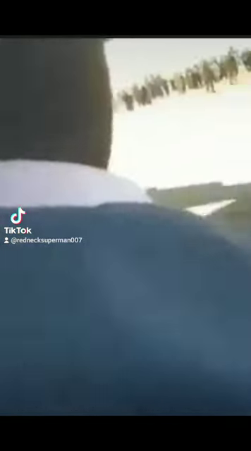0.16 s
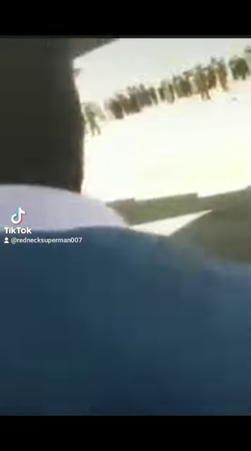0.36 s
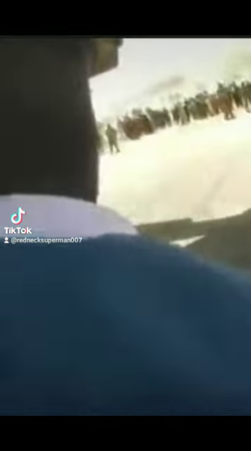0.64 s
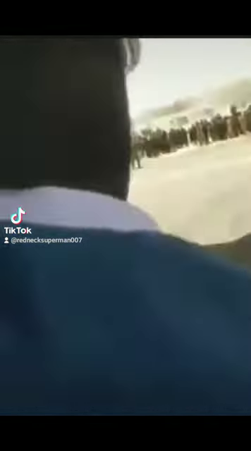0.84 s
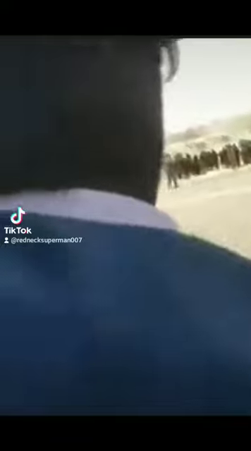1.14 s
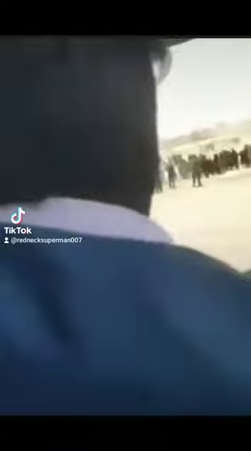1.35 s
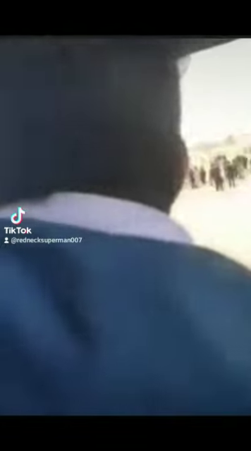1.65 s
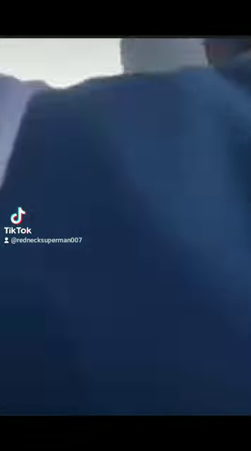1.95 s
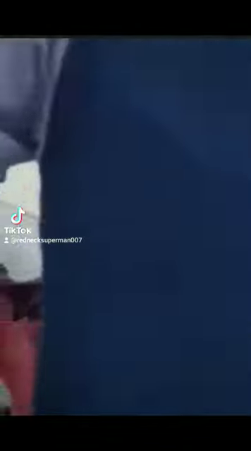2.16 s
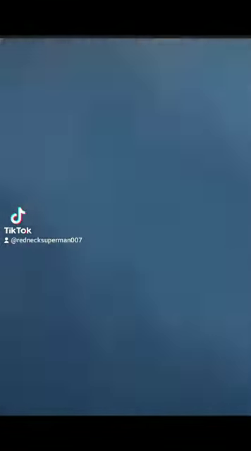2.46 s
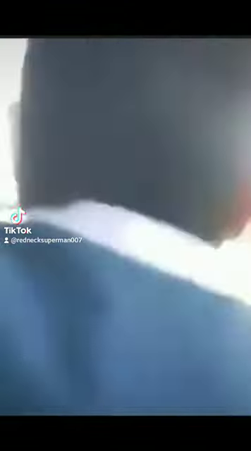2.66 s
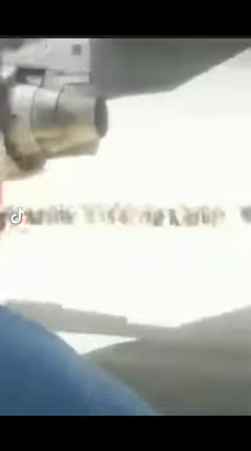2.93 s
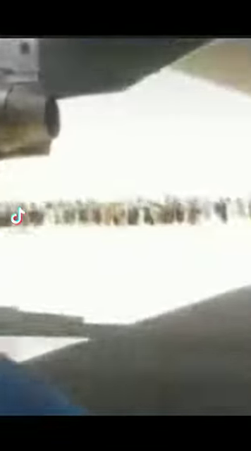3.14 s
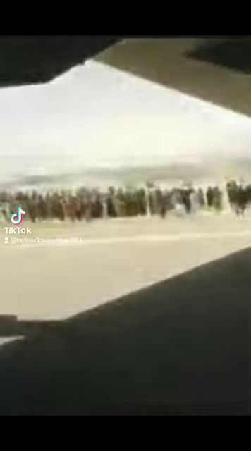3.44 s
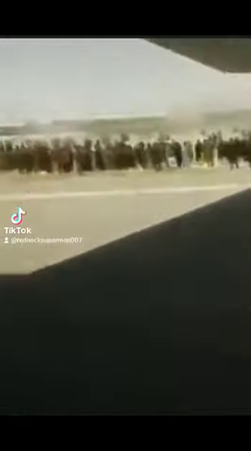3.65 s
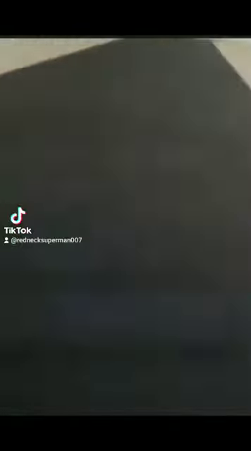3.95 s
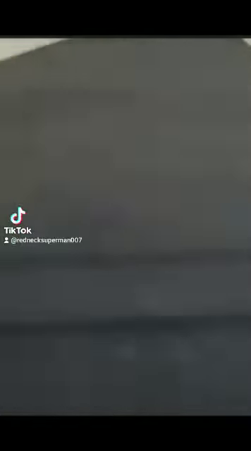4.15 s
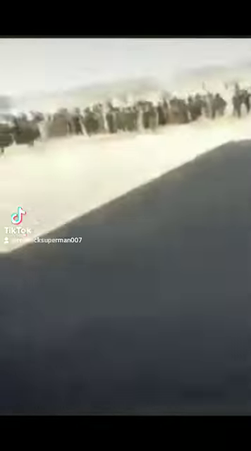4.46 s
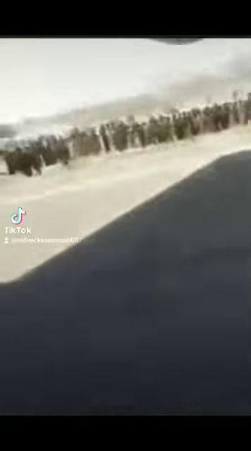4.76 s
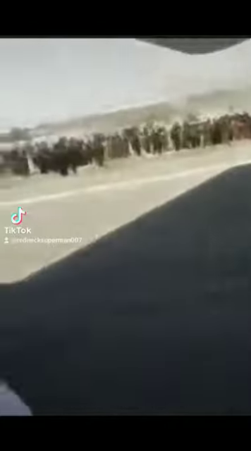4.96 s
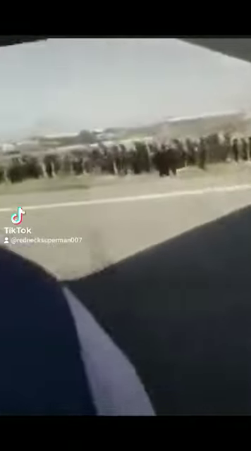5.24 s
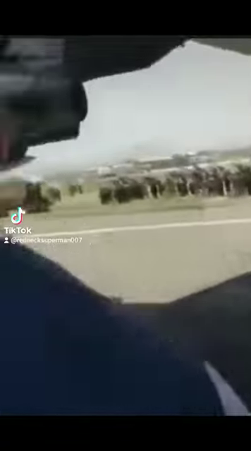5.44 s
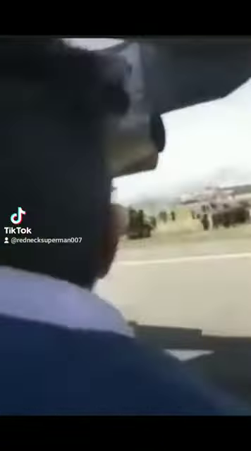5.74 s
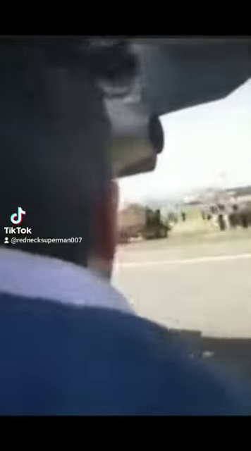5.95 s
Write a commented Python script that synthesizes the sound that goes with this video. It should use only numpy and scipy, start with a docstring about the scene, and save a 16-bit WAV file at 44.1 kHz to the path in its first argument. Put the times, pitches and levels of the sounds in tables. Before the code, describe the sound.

The microphone is inside the cabin of an aircraft rolling over an open airfield. From the very start, a strong, bright rush of air howls in gusts, with low buffeting and a crackling sizzle. It stops abruptly at 0.7 seconds. That leaves the jet engines at a lower level: a wide exhaust roar, a turbine hiss and a fuzzy, high, drifting whine, over the low rumble of the airframe and the boom of the cabin. Between about 1.7 and 2.1 seconds everything swells together, then stays loud and steady until the end, just after 6 seconds. The whine comes and goes, standing out near 0.8, 3 and 4 seconds and from 5 seconds onward. Throughout, a hollow colouring slides across the stereo image as the microphone turns, and the middle and high tones have a watery flicker.

```python
"""Jet engines heard from the cabin of an aircraft rolling over an open airfield.
The exhaust roars, the turbines hiss and whine in a fuzzy band, the cabin booms and the airframe rumbles;
all swell once, about 2 s in. A strong, howling air rush covers the start and stops abruptly at 0.7 s.
Stereo hollows slide as the microphones turn; midrange and treble have a watery flicker."""
import sys
import numpy as np
from scipy import signal
from scipy.fft import rfft, irfft, next_fast_len
from scipy.io import wavfile
from scipy.ndimage import uniform_filter1d

SR = 44100
rng = np.random.default_rng(int(sys.argv[2]) if len(sys.argv) > 2 else 0)


def wrap_up_sound(samples):
    """Save the sound to the file named by the first command line argument, as 16-bit audio."""
    columns = np.atleast_2d(samples).T
    # keep every value between -1 and 1, then stretch to whole-number steps
    tamed = np.clip(columns, -1, 1)
    steps = np.round(tamed * 32767).astype(np.int16)
    wavfile.write(sys.argv[1], SR, steps)


N = 269010
TIME_S = np.arange(N) / SR
FFT_SIZE, OVERLAP = 2048, 1536
BIN_HZ = np.fft.rfftfreq(FFT_SIZE, 1 / SR)
CREST_S = 3.47  # mid-roll

# high sizzle spectrum (frequency [Hz], density [dB])
SIZZLE_SPECTRUM = [(7000, -50), (8300, -7.5), (9200, -3.5), (10200, -1), (11300, 0), (12200, -12)]


def exhaust(drive_db):
    """The jet mixes with still air in a wide roar, loudest in mid-roll."""
    # (frequency [Hz], density [dB])
    roar_spectrum = [(200, -15.5), (400, -4.5), (500, -1.5), (620, -2.5), (750, 0), (900, -4), (1100, -2.5),
                     (1350, -4.5), (1600, -3.5), (2400, -3.5), (2900, -22), (4000, -40), (8000, -65)]
    ease_db_per_s = -0.52
    return amp(-18 + drive_db + ease_db_per_s * abs(TIME_S - CREST_S)) * turbulence(roar_spectrum)


def turbine(drive_db):
    """Air hisses through the compressor; its blade rows add a fuzzy, drifting whine."""
    # (frequency [Hz], density [dB])
    hiss_spectrum = [(1800, -35), (2500, -9.5), (2950, -1), (3450, -2), (3900, 0), (4500, -0.2),
                     (5200, -0.5), (6200, -5.5), (7000, -13.5), (8600, -38), (12200, -58)]
    # (time [s], centre [Hz], level [dB])
    whine_track = [(0, 3900, -15), (.8, 3930, 5), (1.3, 4130, -9), (1.8, 4080, -14), (2.9, 4100, 6),
                   (3.6, 4090, -4), (4.0, 3940, 8), (4.5, 4060, -7), (5.05, 4000, 7), (5.4, 4004, 6),
                   (5.7, 4064, 2), (6.1, 4200, 8.5)]
    # core and skirt (multiple of centre [1], width [Hz], level [dB])
    whine_bands = [(1.0, 33, 0.5), (1.0, 650, -1.5)]
    hiss = amp(-14.5 + drive_db) * turbulence(hiss_spectrum)
    centre_hz, whine_db = curve(whine_track)
    whine = sum(amp(db) * noise_band(multiple * centre_hz, width_hz)
                for multiple, width_hz, db in whine_bands)
    return hiss + amp(-31 + whine_db) * whine


def air_rush():
    """A bright, gusty air stream with low buffeting; it sizzles and crackles most in the gusts."""
    # (frequency [Hz], density [dB])
    stream_spectrum = [(60, -42), (150, -20), (300, -14.5), (430, -6.5), (540, -4), (620, -12), (800, -1.5),
                       (1100, -3), (1550, -2), (2100, -3), (2600, -3), (3200, -1.5), (3750, -3), (4500, -6),
                       (5200, -3), (6200, -9.5), (7100, -14.5), (8600, -35), (12200, -60)]
    buffet_spectrum = [(100, -32), (300, -8), (520, 2.5), (800, 2.5), (1000, -26), (1500, -27)]
    # (time [s], half width [s], gain [dB])
    gusts = [(.17, 0.06, 1.5), (.335, 0.012, -0.5), (.38, .015, 1), (.425, 0.018, 2.5), (.5, 0.039, 3),
             (.55, 0.013, -0.5), (.635, 0.016, -2), (.708, .008, 3)]
    shoves = [(.115, 0.042, 3.5), (.42, 0.033, -3), (.66, 0.02, 4)]
    gust_db = bumps(gusts) + 0.67 * wobble(20, 160)
    shared_only = np.array([[1], [0]])  # arrives from one direction
    buffet = amp(-11.5 + bumps(shoves)) * turbulence(buffet_spectrum) * shared_only
    grit = amp(-17.5) * turbulence(SIZZLE_SPECTRUM) + amp(-13) * crackle()
    stream = gliding_hollows(turbulence(stream_spectrum) + buffet + howl(gust_db))
    return amp(-12.5 + rush_envelope_db()) * (amp(gust_db) * stream + amp(1.1 * gust_db) * grit)


def rush_envelope_db():
    """Hold, sag, abrupt cut, brief tail in the cabin."""
    sag_s, sag_db_per_s = 0.57, -16
    cut_s, cut_db_per_s = 0.712, -500
    tail_db, tail_db_per_s = -1, -135
    after_s = np.maximum(TIME_S - cut_s, 0)
    cut_db = np.maximum(cut_db_per_s * after_s, tail_db + tail_db_per_s * after_s)
    return sag_db_per_s * np.maximum(TIME_S - sag_s, 0) + cut_db


def howl(gust_db):
    """Air passing cabin edges makes fuzzy, fitful tones; their pitch dips in each gust."""
    # (centre [Hz], width [Hz], level [dB])
    tones = [(1713, 91, -21), (2130, 90, -17), (3112, 110, -14), (4870, 170, -14.5)]
    octaves_per_db, fits_db = -0.1, 3
    pitch = 2 ** (octaves_per_db * uniform_filter1d(gust_db, size=2000))
    return sum(amp(db + fits_db * wobble(4.85, 18)) * noise_band(hz * pitch, width_hz)
               for hz, width_hz, db in tones)


def crackle(ticks_per_s=100, centre_hz=2350):
    """Sparse bright ticks, rms 1."""
    ticks = rng.standard_normal((2, N)) * (rng.random(N) < ticks_per_s / SR)
    return unit_rms(resonate(ticks, np.full(N, centre_hz), width_hz=3600))


def gliding_hollows(x):
    """Two moving notches give the rush a torn, vowel-like colour."""
    # (time [s], centre [Hz])
    glide = [(0, 2080), (.13, 1970), (.27, 2100), (.38, 2380), (.5, 2410), (.58, 2200), (.66, 2380)]
    # (multiple of centre [1], width [Hz], depth [0-1])
    notches = [(1.0, 420, 1), (1.83, 600, 0.9)]
    centre_hz, = curve(glide)
    for multiple, width_hz, depth in notches:
        unit_gain = 2 * (1 - np.exp(-np.pi * width_hz / SR)) ** 2
        x = x - depth * unit_gain * resonate(x, multiple * centre_hz, width_hz)
    return x


def cabin(swell_db):
    """The rolling airframe rumbles and the cabin air booms; both are weaker during the rush."""
    # (frequency [Hz], density [dB])
    rumble_spectrum = [(10, -42), (30, -35), (50, -7.5), (70, -1), (100, 1), (150, 2.5), (200, -2),
                       (300, -13.5), (600, -26.5)]
    boom_spectrum = [(120, -23), (200, -6.5), (245, -2), (295, 0.5), (370, -2.5), (430, -2), (520, -14.5),
                     (900, -57)]
    # (time [s], half width [s], gain [dB])
    surges = [(2.2, 0.25, 2), (2.68, 0.17, 2), (3.68, 0.1, -7), (4.15, .1, -1), (5.66, 0.1, 2.5)]
    rushing = amp(rush_envelope_db())
    rumble_db = -29.5 + swell_db - 4 * rushing + bumps(surges) + 0.7 * wobble(2, 8)
    boom_db = -23 + swell_db - 1.5 * rushing
    return amp(rumble_db) * turbulence(rumble_spectrum) + amp(boom_db) * turbulence(boom_spectrum)


def sizzle():
    """Thin, high sizzle above the hiss: swells with the engines, flutters, eases after mid-roll."""
    ease_db_per_s = -1.1
    level_db = -32.5 + swell(quiet_db=-8.5) + ease_db_per_s * np.maximum(TIME_S - CREST_S, 0)
    return amp(level_db + wobble(3, 25)) * turbulence(SIZZLE_SPECTRUM)


def microphones(spectra):
    """A turning pair; the right one's delay cancels sliding bands. Gives mid/side, their ratio [dB]."""
    # (time [s], right delay [ms], diffuseness [1 = usual])
    aim = [(0, 0.3, 1.05), (.35, 0.28, 2.6), (.65, 0.307, 2.15), (.8, 0.36, 0.61), (.97, 0.31, 0.86),
           (1.16, 0.25, 0.75), (1.38, 0.33, 1.26), (1.62, 0.32, 0.78), (1.76, 0.333, 1.5),
           (1.92, 0.37, 1.9), (2.14, 0.45, 0.42), (2.38, 0.46, 0.22), (2.58, 0.47, 1.43), (2.85, 0.3, 0.54),
           (3.05, 0.4, 0.8), (3.3, .33, 0.48), (3.7, 0.35, 1.1), (4.0, 0.37, 0.4), (4.25, 0.37, 1.4),
           (4.45, 0.34, 1.3), (4.88, 0.28, 0.38), (4.98, 0.41, 0.78), (5.12, 0.33, 0.59),
           (5.35, 0.35, 0.67), (5.68, 0.33, 0.56), (5.9, 0.37, 0.62), (6.1, 0.28, 1)]
    # (frequency [Hz], left-right coherence [0-1], extra left lead [rad])
    image = [(30, 1, 0), (70, 1, -0.24), (150, 0.98, -0.61), (306, 0.8, -0.72), (486, 0.34, -0.25),
             (780, 0.28, -0.93), (1230, 0.37, 0.15), (1510, 0.2, -0.085), (2540, 0.51, -0.47),
             (3260, 0.38, -0.14), (4370, 0.03, 0.32), (7000, 0.03, 0.57)]
    delay_ms, diffuseness = (at_frames(column, spectra.shape[2]) for column in curve(aim))
    coherence, lead_rad = spectrum(image, BIN_HZ[:, None])
    coherence = np.clip(coherence, .01, .998) ** diffuseness
    phase_rad = lead_rad * diffuseness + 2 * np.pi * BIN_HZ[:, None] * delay_ms / 1000
    shared, apart = spectra[0] * np.sqrt(1 + coherence), spectra[1] * np.sqrt(1 - coherence)
    left = (shared + apart) * np.exp(.5j * phase_rad)
    right = (shared - apart) * np.exp(-.5j * phase_rad)
    mid_power, side_power = 1 + coherence * np.cos(phase_rad), 1 - coherence * np.cos(phase_rad)
    mid_side = np.array([(left + right) / np.sqrt(mid_power), (left - right) / np.sqrt(side_power)]) / 2
    return mid_side, 10 * np.log10(mid_power / side_power)


def shimmer(x):
    """Watery stereo: patches wander between mid and side; narrow bands flicker and drop out."""
    # (frequency [Hz], image wander [dB], level flicker [dB], dropout threshold [dB])
    texture = [(60, 4, 3, -45), (306, 1, 0.5, -40), (596, 3.5, 3.5, -11), (866, 5.5, 4, -7.5),
               (1290, 7, 3.5, -5), (2240, 13, 4.5, -2.5), (3660, 15, 4.5, -3), (4000, 10.5, 4.5, -7.5),
               (5800, 6, 4, -7), (7920, 30, 7.5, 9.5), (9900, 4.5, 5, -9)]
    wander_db, flicker_db, threshold_db = spectrum(texture, BIN_HZ[:, None])
    mid_side, ratio_db = microphones(signal.stft(x, nperseg=FFT_SIZE, noverlap=OVERLAP)[2])
    shape = bins, frames = mid_side.shape[1:]
    wander = unit_rms(patches(shape, size=(12, 4)) + 0.94 * patches(shape, size=(6, 4)))
    wander *= 1 - 0.34 * at_frames(amp(rush_envelope_db()), frames)  # steadier during the rush
    balance_rad = np.arctan(amp(1.63 * ratio_db + thinning_db(frames) + wander_db * wander))
    flicker = np.minimum([patches(shape, size=(2, 5)) for _ in mid_side], 1.2)  # dips exceed peaks
    gain = amp(flicker_db * flicker) * np.array([np.sin(balance_rad), np.cos(balance_rad)])
    gain /= np.sqrt(1 + (amp(threshold_db) / (gain + 1e-6)) ** 10)  # weak bands fall silent
    gain /= np.sqrt(np.mean(np.sum(gain ** 2, axis=0), axis=1, keepdims=True))  # unit mean power per bin
    mid, side = mid_side * gain
    left_right = np.array([mid + side, mid - side])
    return signal.istft(left_right, nperseg=FFT_SIZE, noverlap=OVERLAP)[1][:, :N]


def thinning_db(frames, centre_hz=2100, half_width_hz=680):
    """The midrange briefly tilts towards the sides; over (bins, frames)."""
    # (time [s], half width [s], mid-to-side ratio [dB])
    tilts = [(.96, .03, -13), (1.18, 0.086, -9.5), (1.6, 0.032, -7), (2.85, 0.1, -8.5), (4.5, 0.14, -3),
             (4.8, 0.21, -11), (5.35, .1, -7)]
    band = np.exp(-((BIN_HZ[:, None] - centre_hz) / half_width_hz) ** 2)
    return band * at_frames(bumps(tilts), frames)


def turbulence(colour):
    """Coloured noise, rms 1: one row common to the microphones, one in which they differ."""
    length = next_fast_len(N)
    gain = amp(spectrum(colour, np.fft.rfftfreq(length, 1 / SR))[0])
    white = rng.standard_normal((2, length))
    return unit_rms(irfft(rfft(white) * gain, length)[:, :N])


def noise_band(centre_hz, width_hz):
    """Noise around a moving centre, rms 1."""
    return unit_rms(resonate(rng.standard_normal((2, N)), centre_hz, width_hz))


def resonate(x, centre_hz, width_hz):
    """Moving resonance: shift to 0 Hz, smooth twice, shift back."""
    carrier = np.exp(2j * np.pi * np.cumsum(centre_hz) / SR)
    pole = np.exp(-np.pi * width_hz / SR)
    return (carrier * signal.lfilter([1], [1, -2 * pole, pole * pole], x / carrier)).real


def swell(quiet_db, start_s=1.67, rise_s=0.43):
    """Level re full [dB]: quiet, one even rise, hold."""
    return quiet_db * (1 - np.clip((TIME_S - start_s) / rise_s, 0, 1))


def wobble(slow_hz, fast_hz):
    """Random movement between two rates, rms 1."""
    rates_hz = np.geomspace(slow_hz, fast_hz, 20)
    return unit_rms(sum(np.sin(2 * np.pi * (hz * TIME_S + rng.random())) for hz in rates_hz))


def bumps(table):
    """Bell-shaped rises and dips [dB], one per row."""
    return sum(db * np.exp(-((TIME_S - at_s) / half_s) ** 2) for at_s, half_s, db in table)


def patches(shape, size):
    """Smooth random field over (bins, frames), rms 1."""
    field = rng.standard_normal(shape)
    for axis, length in enumerate(size):
        for _ in range(2):
            field = uniform_filter1d(field, length, axis, mode="wrap")
    return unit_rms(field)


def curve(table):
    """Columns of a time table at every sample."""
    times_s, *columns = np.transpose(table)
    return [np.interp(TIME_S, times_s, column) for column in columns]


def spectrum(table, at_hz):
    """Columns of a frequency table, interpolated on a log axis."""
    hz, *columns = np.transpose(table)
    return [np.interp(np.log(at_hz + 1), np.log(hz), column) for column in columns]


def at_frames(x, frames):
    """One value per spectral frame."""
    return x[np.linspace(0, N - 1, frames).astype(int)]


def amp(db):
    """Decibels to gain."""
    return 10 ** (np.asarray(db) / 20)


def unit_rms(x):
    """Scales to rms 1."""
    return x / np.sqrt(np.mean(x ** 2) + 1e-20)


def scene():
    """Roar, hiss and cabin share one swell; roar and hiss also flutter together."""
    swell_db = swell(quiet_db=-6)
    drive_db = swell_db + 0.23 * wobble(7.9, 18)
    return shimmer(cabin(swell_db) + exhaust(drive_db) + turbine(drive_db) + sizzle() + air_rush())


def record(dry):
    """The highest peaks clip; then a treble hollow and a band limit."""
    # (frequency [Hz], gain [dB])
    treble_hollow = [(7200, 0), (7500, -1), (7700, -9), (8030, -9), (8180, -28), (8330, 0)]
    cutoff_hz = 12200
    clipped = np.clip(dry, -.97, .97)
    notch = signal.firwin2(1023, BIN_HZ, amp(spectrum(treble_hollow, BIN_HZ)[0]), fs=SR)
    lowpass = signal.firwin(511, cutoff_hz, window=("kaiser", 9), fs=SR)
    return signal.oaconvolve(clipped, np.convolve(notch, lowpass)[None], "same", axes=1)


dry = scene()
out = record(dry)
wrap_up_sound(out)
```